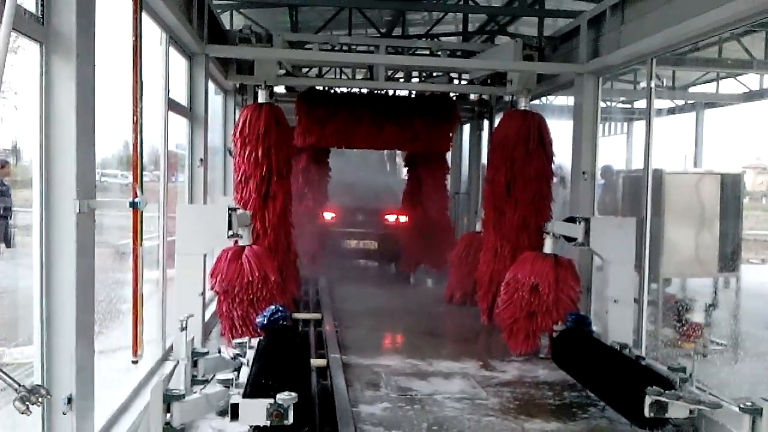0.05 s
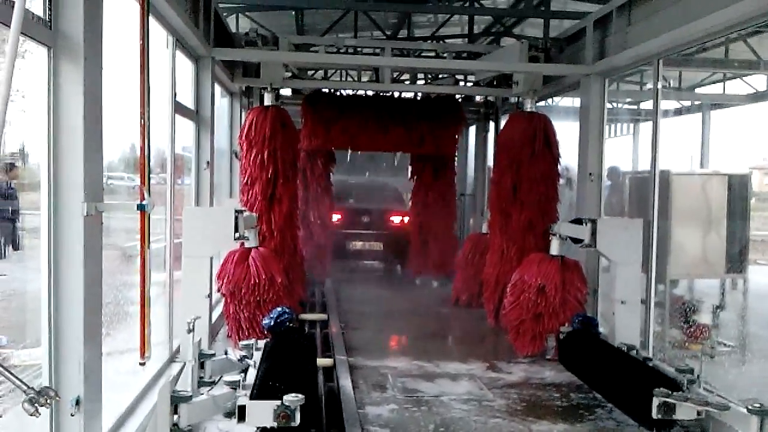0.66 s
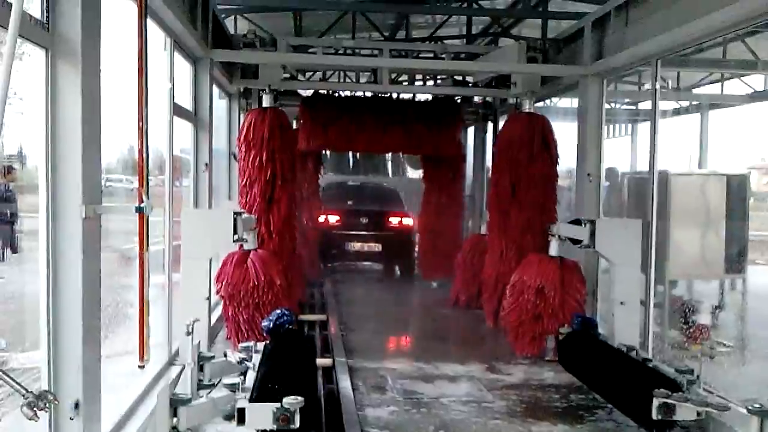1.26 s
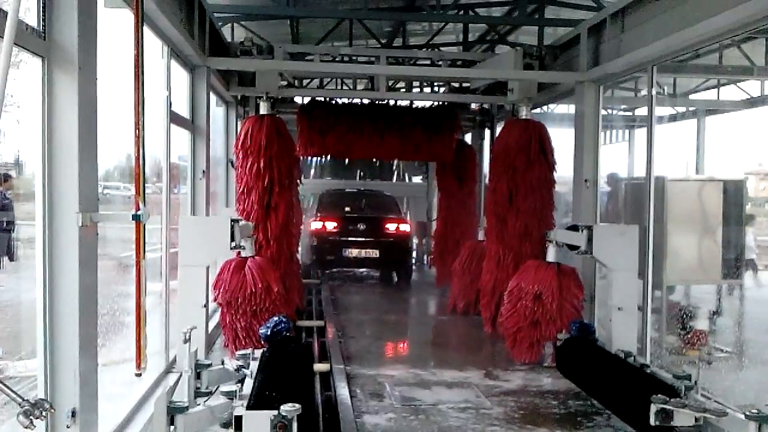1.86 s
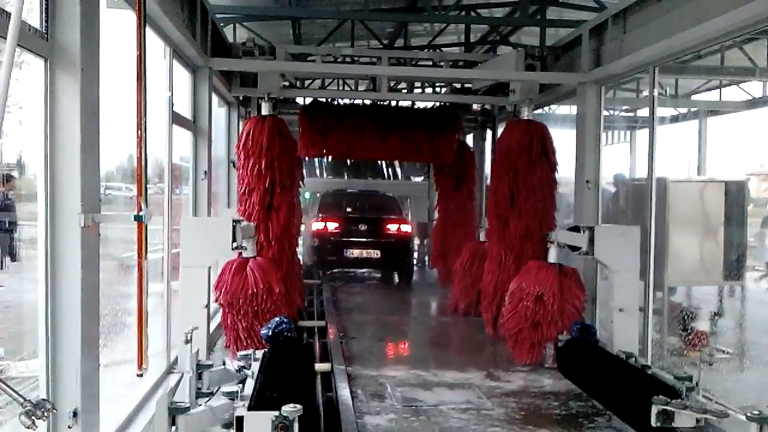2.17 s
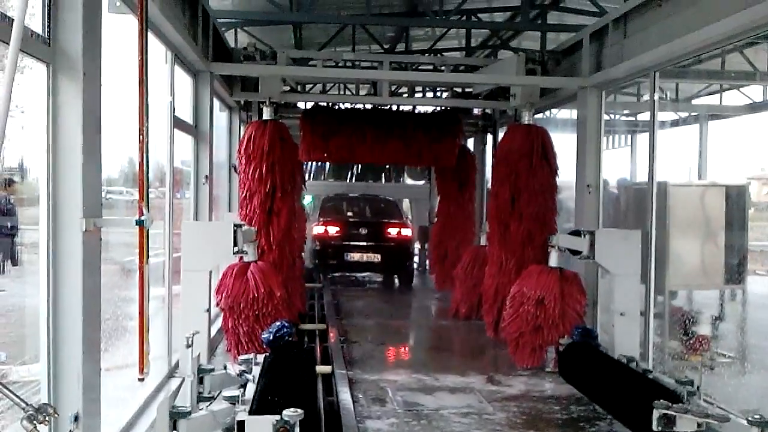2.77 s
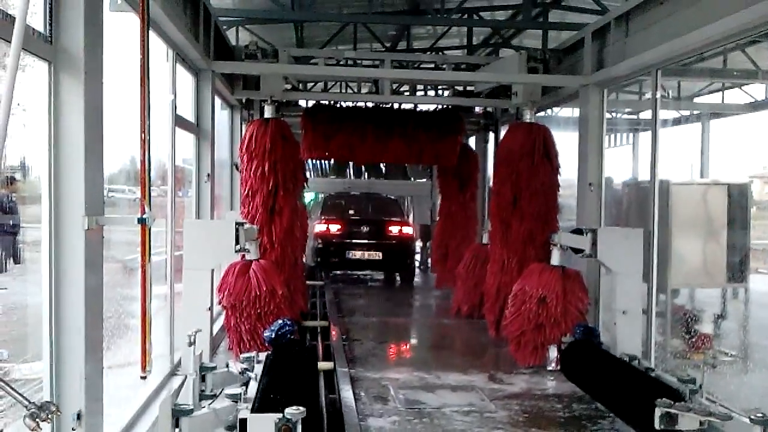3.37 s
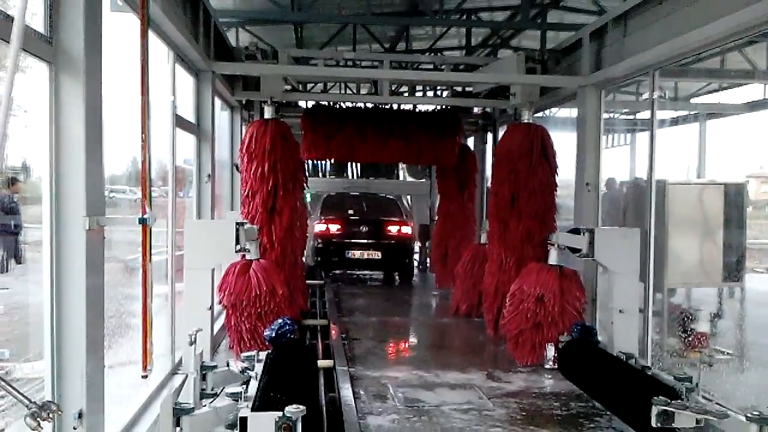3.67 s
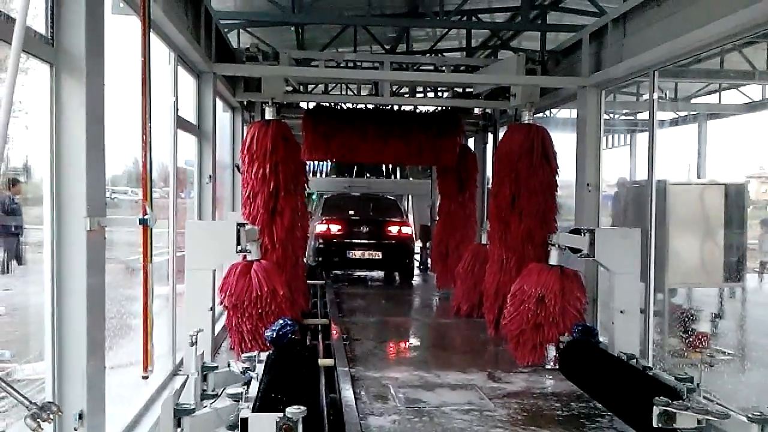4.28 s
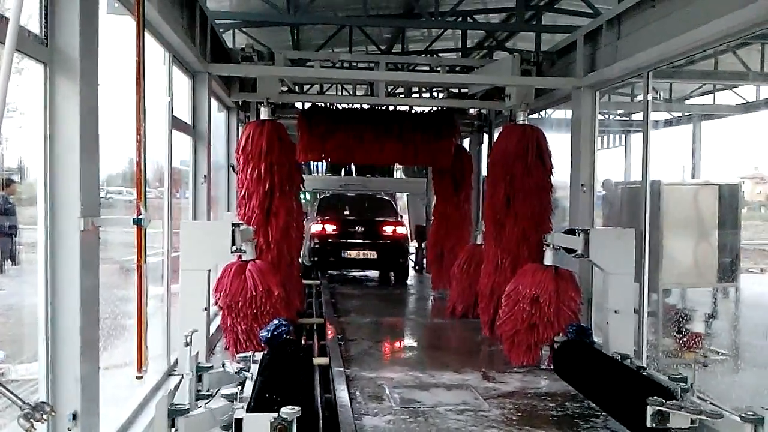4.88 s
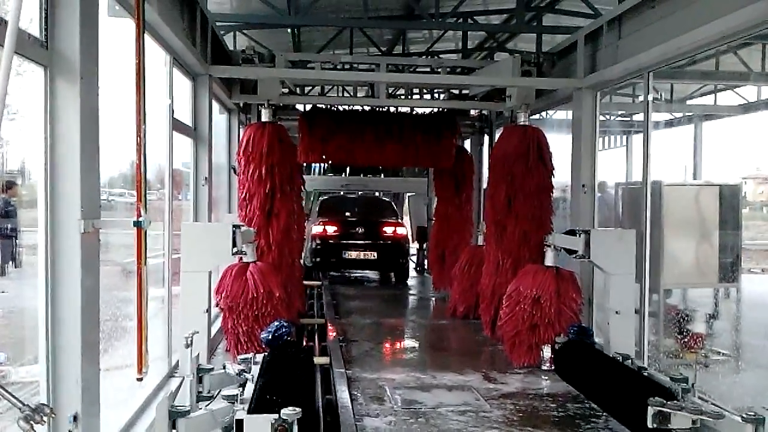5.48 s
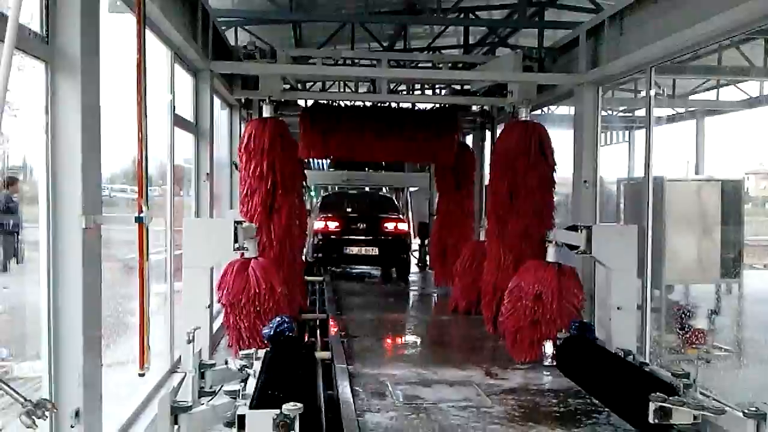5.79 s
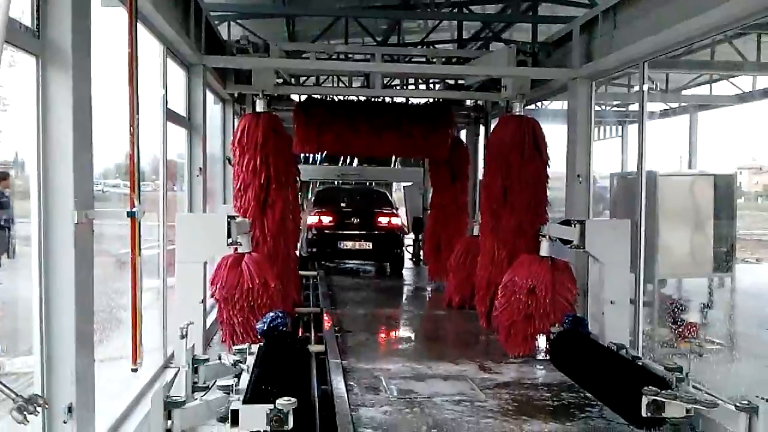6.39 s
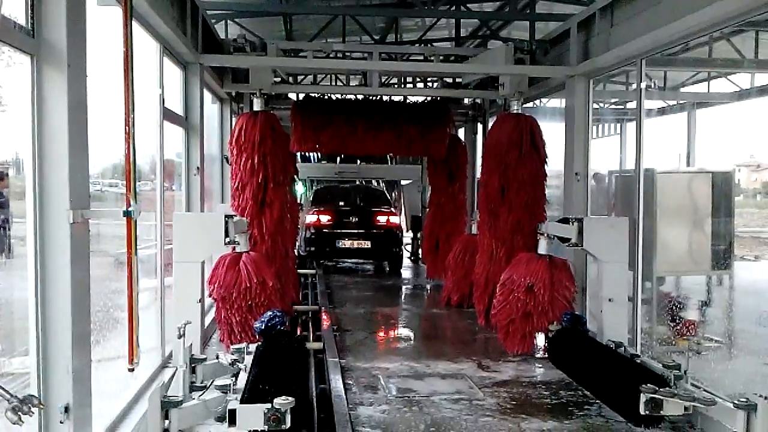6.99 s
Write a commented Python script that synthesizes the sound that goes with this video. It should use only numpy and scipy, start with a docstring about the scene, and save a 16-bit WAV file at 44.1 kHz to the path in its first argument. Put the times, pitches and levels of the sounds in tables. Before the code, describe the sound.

Inside a car wash bay, rotating brushes and their drives rumble without a break, mixed with the swish of wet cloth on bodywork, hissing water jets and a faint motor hum. Wind bumps the microphone early on, then a valve releases a brief puff of air. Two more clusters of dull wind thumps follow, just past the middle and near the end. A couple of faint ticks come from the fittings. The microphone is at the entrance.

```python
"""A car wash tunnel, heard from its entrance. Drives and turning brushes rumble in the glass bay,
wet cloth strips slap the car, and water spray hisses and patters over a faint motor tone.
A valve lets off one short puff of air, fittings tick faintly, and a few gusts buffet and thump
the microphone, mostly at its right port."""
import sys
import numpy as np
from scipy import signal
from scipy.fft import rfft, irfft, next_fast_len
from scipy.io import wavfile
from scipy.ndimage import uniform_filter1d, minimum_filter1d, map_coordinates

SR = 44100
rng = np.random.default_rng(int(sys.argv[2]) if len(sys.argv) > 2 else 0)


def master_out(mix):
    """Clip the mix to full scale and print it as 16-bit PCM to the path in sys.argv[1]."""
    frames = np.transpose(np.atleast_2d(mix))
    ceiling = np.clip(frames, -1, 1)
    pcm = np.round(ceiling * 32767).astype(np.int16)
    wavfile.write(sys.argv[1], SR, pcm)


N = 319284

# How alike the bay sounds at the two microphone ports: freq_hz, coherence
PORT_COHERENCE = [(60, .94), (220, .96), (340, .94), (470, .73), (570, .82), (720, .83), (1000, .46),
                  (1400, .22), (2200, .17), (3000, .05), (8000, 0)]
# Phase of the left port ahead of the right: freq_hz, lead_rad
PORT_PHASE = [(60, 0), (300, .2), (480, .4), (620, .25), (780, .45), (950, 1.3), (1350, 1.2), (1600, 2.7),
              (1900, .2), (8000, 0)]
# Each port colours the bay differently: freq_hz, left_over_right_db
PORT_BALANCE = [(60, 2), (200, 5), (400, 4.5), (580, 8.5), (850, 3.5), (1130, 8), (1700, 1.5), (2300, 0),
                (2850, -2.5), (3550, 1), (4200, -3), (4950, -6), (5850, 2.5), (6500, -2), (7300, -13)]
# Ticks of the fittings: start_s, level_db
FITTING_TICKS = [(1.645, -31.5), (3.928, -35.5), (3.965, -46)]
# Thin, bright colour of a tick: freq_hz, level_db
TICK_EQ = [(1500, -23), (3500, -5.5), (4800, 3), (6300, -3.5), (7500, -12.5), (8500, -35.5)]
# Gusts at the microphone: peak_s, level_db, width_s, left_over_right_db
WIND_GUSTS = [(.775, -22.5, 0.017, 4), (.83, -18, 0.011, 3), (.908, -21, 0.018, 5),
              (1.395, -17.5, .014, -1), (1.453, -11.5, 0.014, -5), (1.512, -14, 0.012, 1),
              (1.552, -19, .009, -1), (1.608, -13, .015, 0), (1.642, -15, .011, -2),
              (1.685, -20.5, .014, 9), (1.74, -20.5, .018, -3), (3.527, -20, 0.014, 6),
              (3.627, -14, 0.015, -5), (3.683, -11, 0.017, -5), (3.738, -18.5, 0.016, 3.5),
              (3.805, -22, .02, 6.5), (4.03, -29, .11, 3.5), (6.572, -14, 0.019, -8),
              (6.613, -18.5, .008, -9), (6.688, -18, 0.0099, -2), (7.2, -24, .035, 8)]
# Dull colour of the buffeting: freq_hz, level_db
WIND_EQ = [(22, -55.5), (35, -29), (55, -12), (85, 1), (200, 2.5), (350, -1.5), (600, -2), (950, -12),
           (1400, -16.5), (2500, -65)]
# Single eddies hitting the microphone: peak_s, level_db, pitch_hz, left_over_right_db
EDDY_THUMPS = [(0.912, -6, 170, -2), (1.441, -8, 230, -3), (1.465, -7.5, 250, 0), (1.57, -2, 525, -13),
               (1.622, -14, 170, 4), (1.659, -12, 200, 2), (1.676, -14, 130, 6), (1.961, -11, 171, -12),
               (2.523, -15, 170, -14), (3.403, -9.5, 170, -18), (3.666, -6, 170, -10),
               (3.686, -7.5, 300, -1), (3.748, -13, 160, 7), (3.86, -8, 230, -8), (3.988, -10, 191, -10),
               (6.58, -8, 402, -14), (6.616, -4.5, 280, -16), (6.696, -7, 400, -16)]
# Colour of the valve's air jet: freq_hz, level_db
AIR_EQ = [(200, -25), (420, -12), (530, 6), (900, 2.5), (1400, -3), (2300, -3.5), (2900, -8.5),
          (3800, -6.5), (5000, -17), (6200, -16), (7200, -28), (8400, -52.5)]
# Midrange wash of the water jets: freq_hz, level_db
SPRAY_EQ = [(880, -24.5), (1420, -1), (1650, -2.5), (1930, 0.5), (2270, -0.7), (2800, -6.5), (3500, -5.5),
            (4050, -7), (5000, -16), (6500, -47.5), (11000, -120)]
# High sizzle of the finest drops: freq_hz, level_db
MIST_EQ = [(3500, -36), (4700, -5), (5400, 0.5), (6000, 2), (6600, 0), (7200, -8), (7800, -18),
           (8400, -27.5), (8700, -50.5)]
# Colour of wet cloth on bodywork: freq_hz, level_db
CLOTH_EQ = [(250, -33.5), (420, -3), (467, -7.5), (537, -1.5), (695, -1.5), (781, -2.5), (1160, -7),
            (1220, -6.5), (1700, -16.5), (2210, -39.5), (3740, -120)]
# Low body of the drives and rollers: freq_hz, level_db
RUMBLE_EQ = [(20, -64.5), (30, -43.5), (42, -25), (60, -11), (75, -3.5), (100, -3.5), (125, -3), (160, 1),
             (215, 0), (270, -5.5), (340, -4.5), (450, -15), (600, -22.5), (1000, -68.5)]
# Slow rise and fall of the rumble: time_s, relative_level_db
RUMBLE_FADER = [(0, -22.5), (.85, -21), (.98, -23.5), (1.5, -21), (2.9, -21.5), (3.9, -20), (5.6, -21.5),
                (7.24, -20.5)]
# Narrow resonances of the bay and the brush frames: centre_hz, width_hz, level_db
BAY_RESONANCES = [(100.4, 6.8, -33), (161.5, 14, -30), (203.7, 2.5, -34.5), (222.7, 9, -29),
                  (261.6, 3, -37), (297, 7, -36), (317.6, 4.8, -37), (364, 8.8, -42), (544, 12, -45.5),
                  (582, 5.2, -48), (683.5, 6.3, -43), (817, 18, -55), (880, 7.8, -46), (1131, 9.3, -44)]


def amp(db):
    """Decibels to gain."""
    return 10 ** (np.asarray(db) / 20)


def unit(x):
    """x scaled to rms 1."""
    return x / np.sqrt(np.mean(x ** 2) + 1e-20)


def along(points, hz):
    """A curve of (freq_hz, value) points, read on a log frequency axis."""
    freqs, values = np.transpose(points)
    return np.interp(np.log(hz + 1), np.log(freqs + 1), values)


def since(start_s):
    """Seconds since start_s, for every sample."""
    return np.arange(N) / SR - start_s


def wobble(rate):
    """A smooth random curve, rate knots a second."""
    knots = rng.standard_normal(int(N * rate / SR) + 4)
    return map_coordinates(knots, [np.arange(N) * rate / SR])


def filtered(x, response):
    """x through a filter whose complex gain is response(hz)."""
    size = next_fast_len(N + SR // 2)
    return irfft(rfft(x, size) * response(np.fft.rfftfreq(size, 1 / SR)), size)[..., :N]


def noise():
    """Two unrelated white noises."""
    return rng.standard_normal((2, N))


def shaped(x, eq):
    """x coloured by an EQ curve, at rms 1."""
    return unit(filtered(x, lambda hz: amp(along(eq, hz))))


def impacts(per_s, decay_s, scatter_db=2.5):
    """A shower of tiny noise bursts of random size."""
    sizes = (rng.random((2, N)) < per_s / SR) * amp(scatter_db * noise())
    power = signal.lfilter([1], [1, -np.exp(-2 / (decay_s * SR))], sizes ** 2)
    return unit(np.sqrt(power) * noise())


def at_ports(pair):
    """Two unrelated signals become one sound field: nearly mono in the bass, diffuse in the treble."""
    spread = lambda hz: np.arccos(along(PORT_COHERENCE, hz)) / 2
    mid, side = filtered(pair, lambda hz: np.array([np.cos(spread(hz)), np.sin(spread(hz))]))
    left = lambda hz: amp(along(PORT_BALANCE, hz) / 2) * np.exp(.5j * along(PORT_PHASE, hz))
    return filtered(np.array([mid + side, mid - side]), lambda hz: np.array([left(hz), 1 / left(hz)]))


def motor(pitch_hz=291.7, level_db=-35.5, waver_hz=.41, waver_db=2):
    """A drive motor holds one faint tone, wavering with its load."""
    phase = 2 * np.pi * np.cumsum(pitch_hz + waver_hz * wobble(3)) / SR
    return amp(level_db) * unit(amp(waver_db * wobble(2.5)) * np.sin(phase))


def fittings(attack_s=.004, crack_t60_s=.074, tail_t60_s=.6, tail_db=-11):
    """Fittings tick, and the bay answers each tick with a soft tail."""
    envelope = np.zeros(N)
    for start_s, level_db in FITTING_TICKS:
        age = np.maximum(since(start_s), 0)
        decay = amp(-60 * age / crack_t60_s) + amp(tail_db - 60 * age / tail_t60_s)
        envelope += np.minimum(age / attack_s, 1) * amp(level_db) * decay
    return envelope * shaped(noise(), TICK_EQ)


def gust(peak_s, level_db, width_s, left_db, fall_over_rise=1.1):
    """One gust's strength at each port: it swells exponentially, rounds off and dies away."""
    widths = since(peak_s) / width_s
    swell = 2 * np.exp(-np.logaddexp(-widths, widths / fall_over_rise))
    return amp([[level_db + left_db], [level_db]]) * swell


def wind(shelter_hz=260, flutter_db=2, shared=.37):
    """Eddies buffet the right port; the sheltered left gets only their low end, partly in step."""
    strength = np.sqrt(sum(gust(*row) ** 2 for row in WIND_GUSTS))
    own, right = shaped(noise(), WIND_EQ)
    blend = shared * right + np.sqrt(1 - shared ** 2) * own
    left = filtered(blend, lambda hz: 1 / np.sqrt(1 + (hz / shelter_hz) ** 4))
    return np.array([left, right]) * strength * amp(flutter_db * wobble(45))


def thumps(half_width_cycles=.65):
    """Each single eddy gives the ports one quick push and pull."""
    ports = np.zeros((2, N))
    for peak_s, level_db, pitch_hz, left_db in EDDY_THUMPS:
        cycles = since(peak_s) * pitch_hz
        window = np.exp(-(cycles / half_width_cycles) ** 2)
        pulse = window * np.sin(2 * np.pi * (cycles + rng.random()))
        ports += amp([[level_db + left_db], [level_db]]) * pulse
    return ports


def valve(start_s=2.735, attack_s=.026, hold_s=.045, puff_db=-18.5, puff_t60_s=.5,
          hiss_db=-26, hiss_hz=3000, hiss_t60_s=.2, leak_lead_s=.025, echo_s=.0035):
    """The seal leaks, then air puffs out, brightest at first, and dies away in the bay."""
    age = since(start_s)
    opening = np.clip(age / attack_s, 0, 1) ** 2
    open_s = np.maximum(age - attack_s, 0)
    release_db = -60 * np.maximum(open_s - hold_s, 0) / puff_t60_s
    # The echo off a nearby panel hollows the jet.
    hollow = filtered(noise(), lambda hz: 1 + .28 * np.exp(-2j * np.pi * hz * echo_s))
    puff = opening * amp(puff_db + release_db) * shaped(hollow, AIR_EQ)
    leak = amp(-5.5) * np.clip(2 * (age + leak_lead_s) / attack_s, 0, 1)
    bright = unit(filtered(shaped(noise(), AIR_EQ), lambda hz: hz ** 4 / (hz ** 4 + hiss_hz ** 4)))
    hiss = np.maximum(leak, opening) * amp(hiss_db - 60 * open_s / hiss_t60_s) * bright
    return puff + hiss


def water(spray_db=-30, mist_db=-44, thick_db=3, thins_at_s=.35, thins_over_s=.5):
    """Jets drum on the car and the floor; the finest drops hiss in a mist that starts thick and thins."""
    thickness = np.clip(1 - since(thins_at_s) / thins_over_s, 0, 1)
    drops = impacts(per_s=1200, decay_s=.0033)
    spray = amp(spray_db + .25 * wobble(9)) * shaped(noise() + .5 * drops, SPRAY_EQ)
    mist_gain = amp(mist_db + thick_db * thickness + .33 * wobble(5))
    return spray + mist_gain * shaped(noise() + .32 * drops, MIST_EQ)


def tremolo(rate_hz=13.35, depth_db=.23):
    """A slight, fast tremolo on the rumble and the cloth wash."""
    return amp(depth_db * np.sin(2 * np.pi * rate_hz * since(0)))


def brushes(level_db=-26.5):
    """Countless wet cloth strips slap the bodywork; the bay smears them into a wash."""
    slaps = impacts(per_s=280, decay_s=.008)
    gain = np.sqrt(tremolo()) * amp(level_db + .53 * wobble(7))
    return gain * shaped(noise() + .47 * slaps, CLOTH_EQ)


def bay_response(hz):
    """The bay's gain: each resonance holds its own power in a narrow band."""
    power = sum(amp(db) ** 2 * SR / (np.pi * width) / (1 + ((hz - centre) / width) ** 2) ** 2
                for centre, width, db in BAY_RESONANCES)
    return np.sqrt(power)


def rumble(trim_db=-1.23):
    """Drives and brush rollers shake the bay, which booms at its resonances."""
    fader_db = np.interp(since(0), *np.transpose(RUMBLE_FADER))
    body = amp(fader_db + trim_db) * shaped(noise(), RUMBLE_EQ)
    boom = filtered(noise(), bay_response)
    return tremolo() * (body + boom)


def scene():
    """The bay reaches both ports, the motor sits in the centre, and wind arises at the ports."""
    bay = at_ports(rumble() + brushes() + water() + valve() + fittings())
    return bay + motor() + wind() + thumps()


def record(dry, ceiling=.82, window_samples=400, top_hz=8600):
    """A limiter eases the hardest gusts, and a steep high cut takes off the top end."""
    needed = ceiling / np.maximum(np.abs(dry).max(axis=0), ceiling)
    gain = uniform_filter1d(minimum_filter1d(needed, window_samples), window_samples)
    return filtered(dry * gain, lambda hz: hz < top_hz)


dry = scene()
out = record(dry)
master_out(out)
```